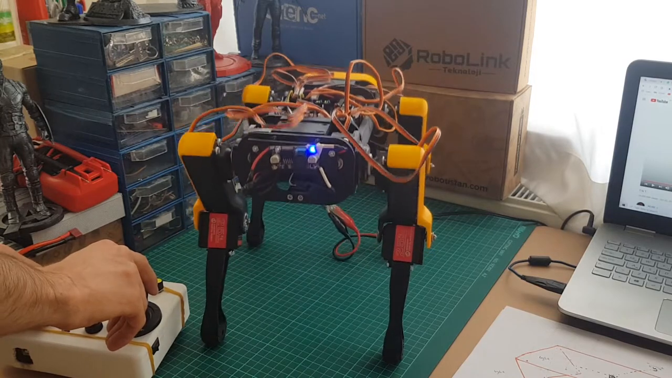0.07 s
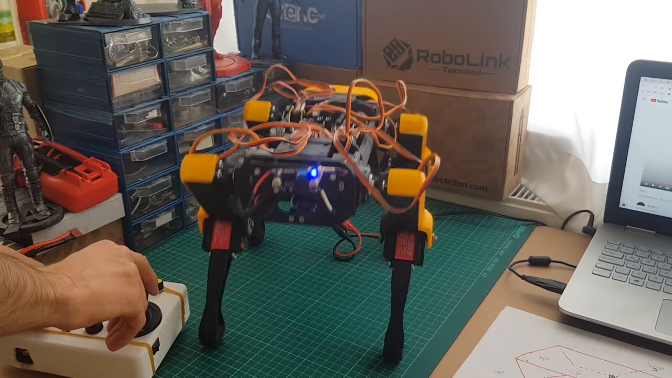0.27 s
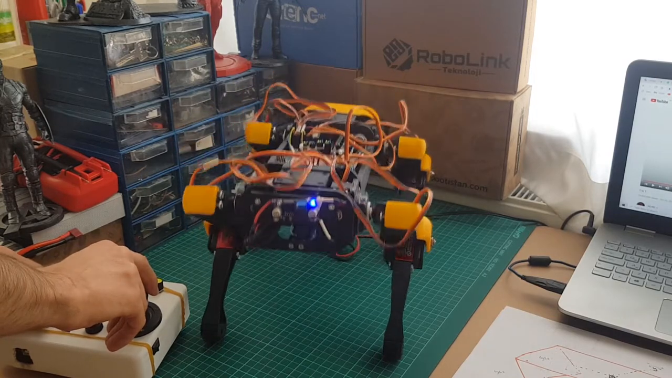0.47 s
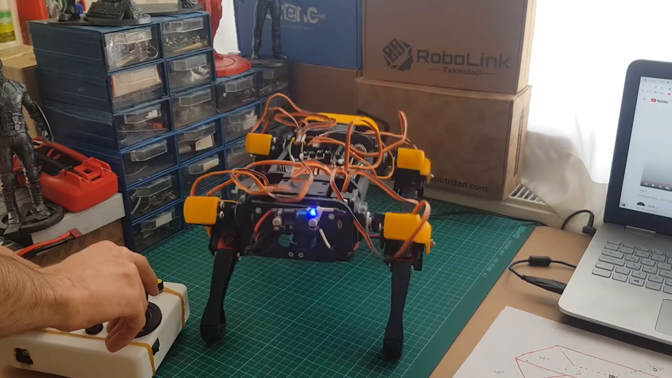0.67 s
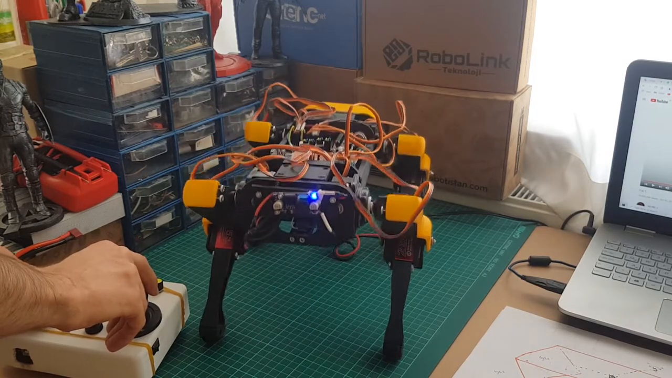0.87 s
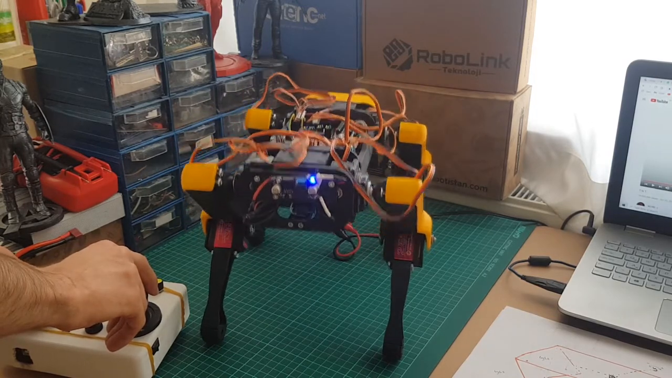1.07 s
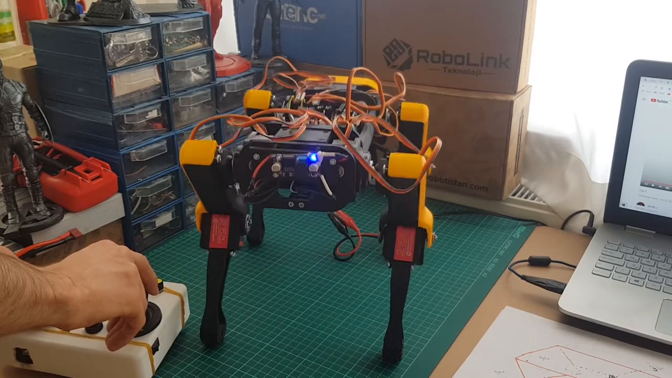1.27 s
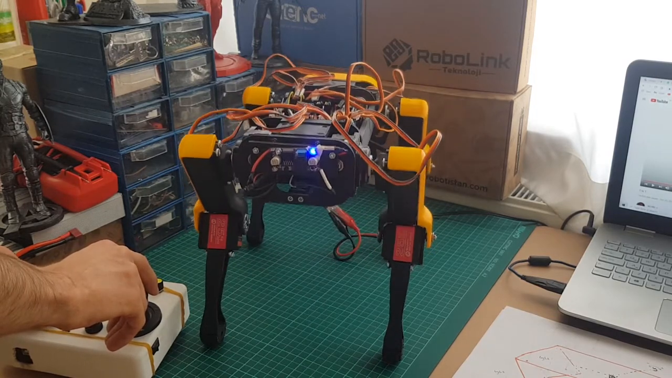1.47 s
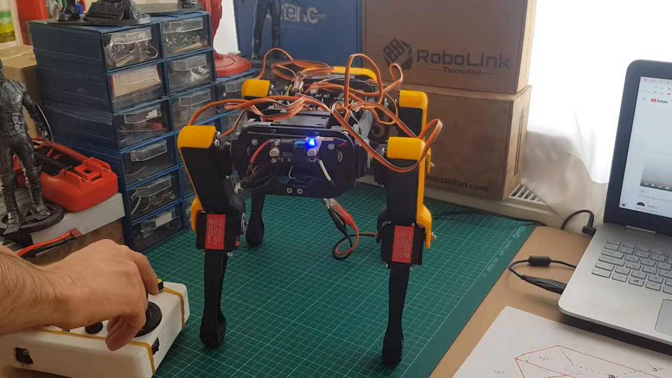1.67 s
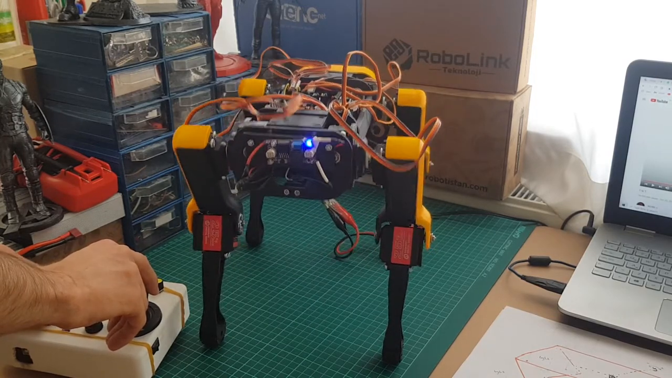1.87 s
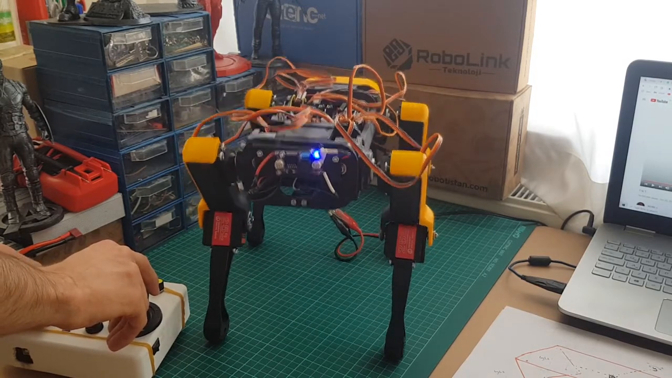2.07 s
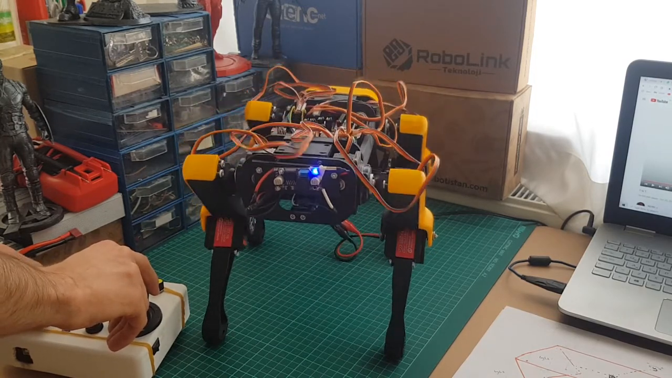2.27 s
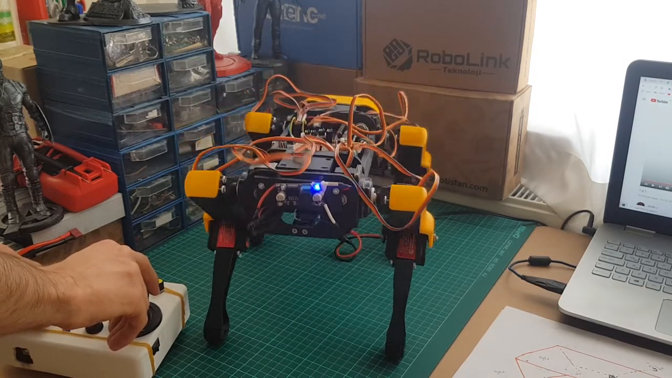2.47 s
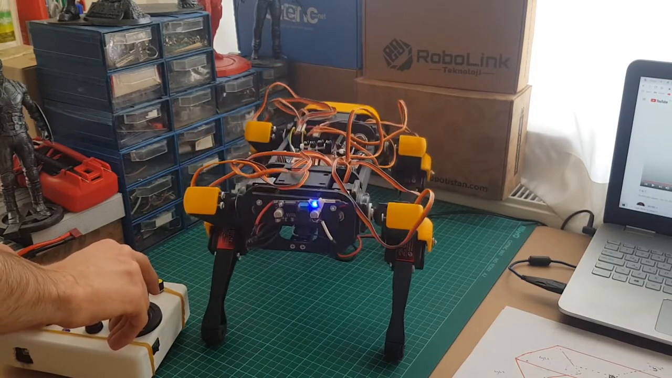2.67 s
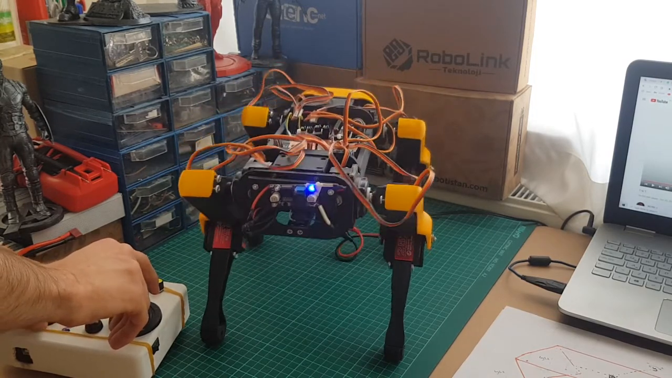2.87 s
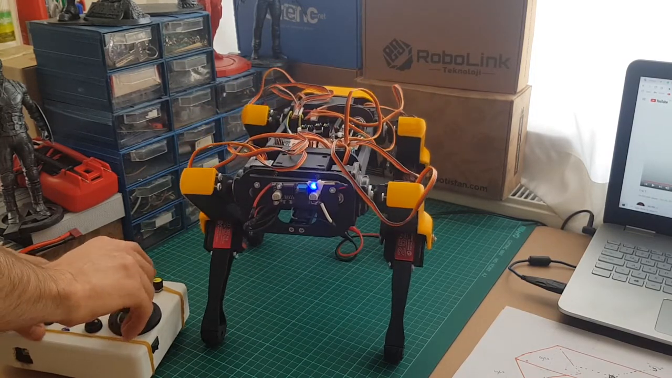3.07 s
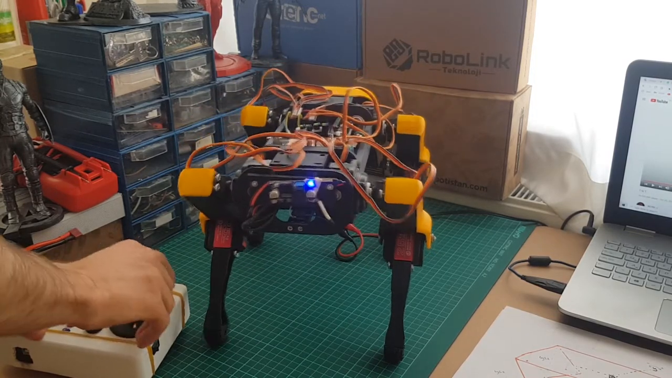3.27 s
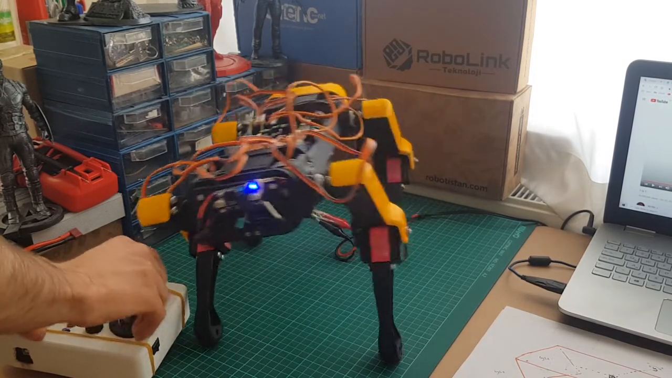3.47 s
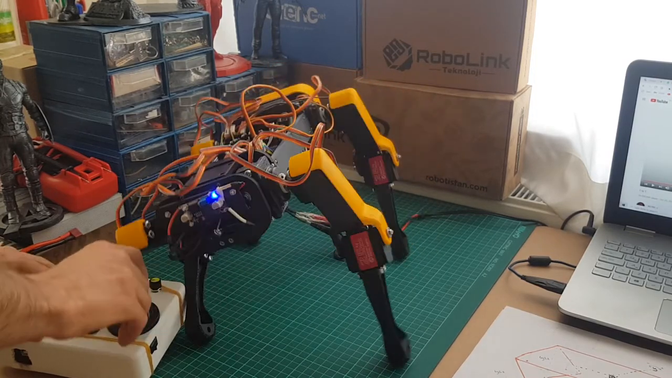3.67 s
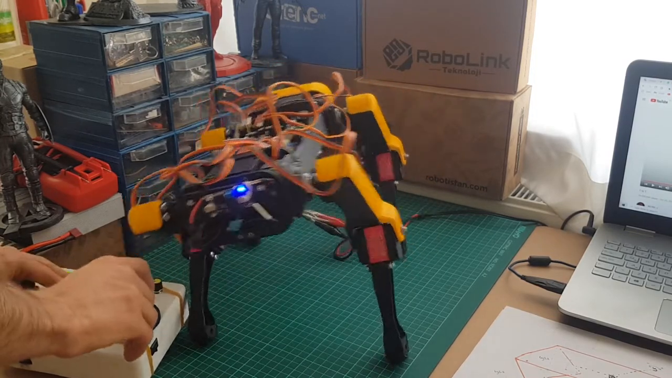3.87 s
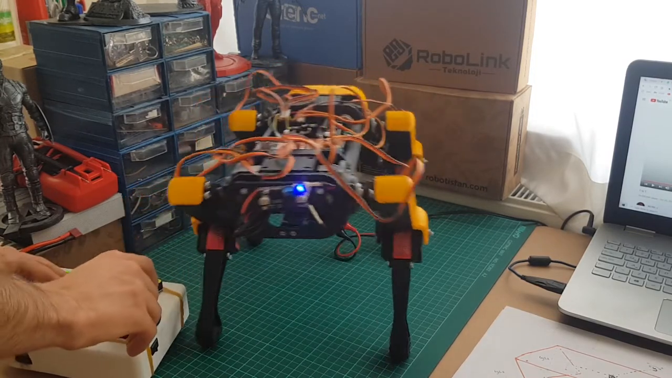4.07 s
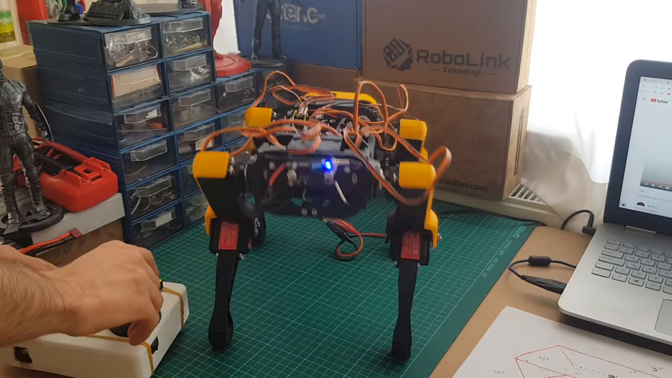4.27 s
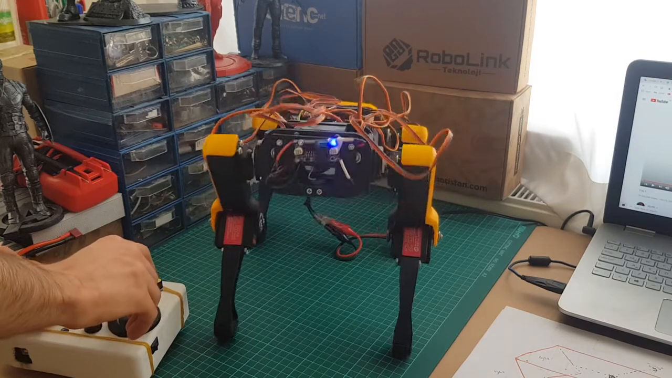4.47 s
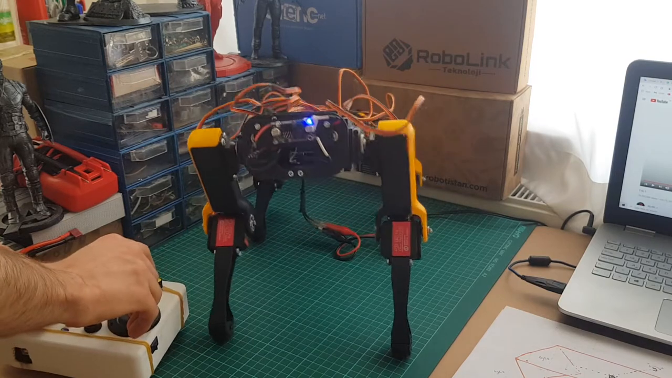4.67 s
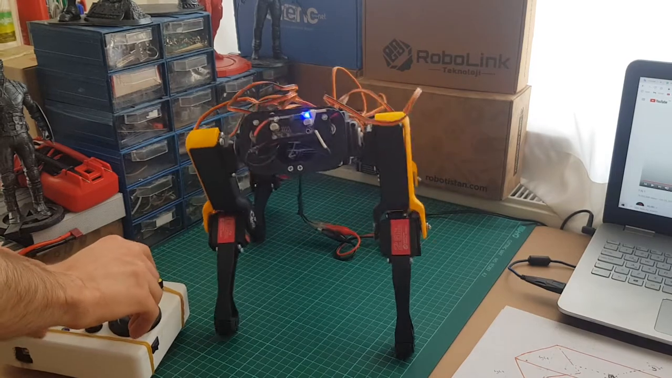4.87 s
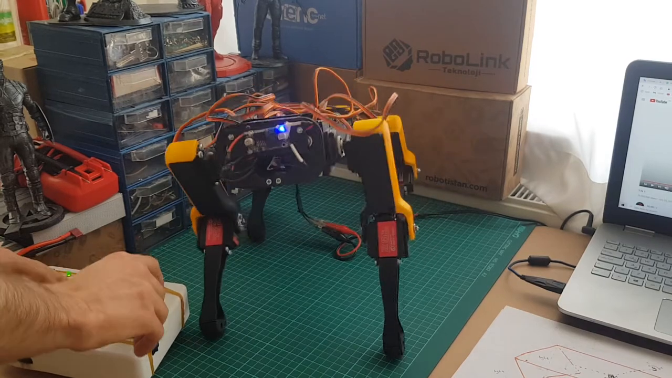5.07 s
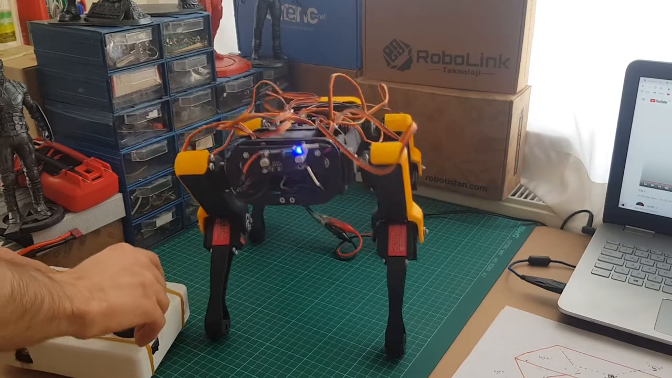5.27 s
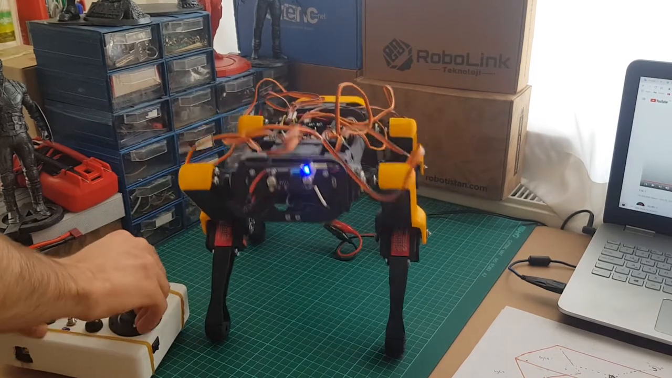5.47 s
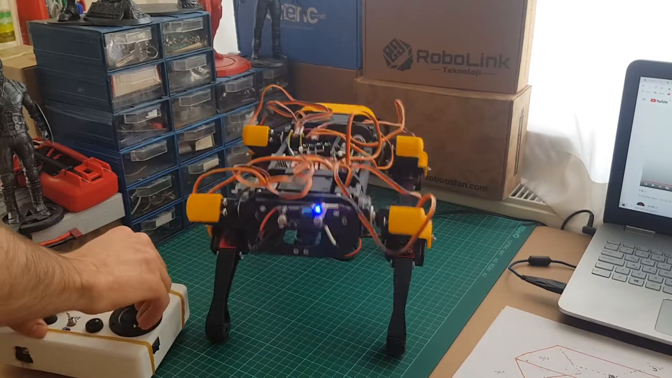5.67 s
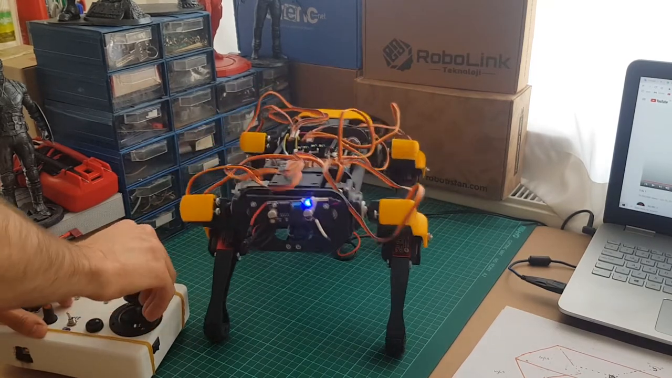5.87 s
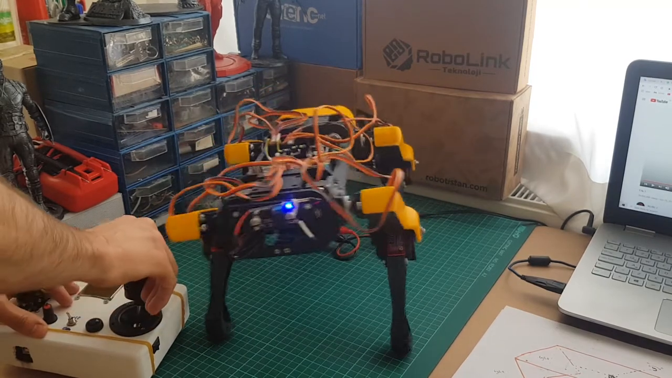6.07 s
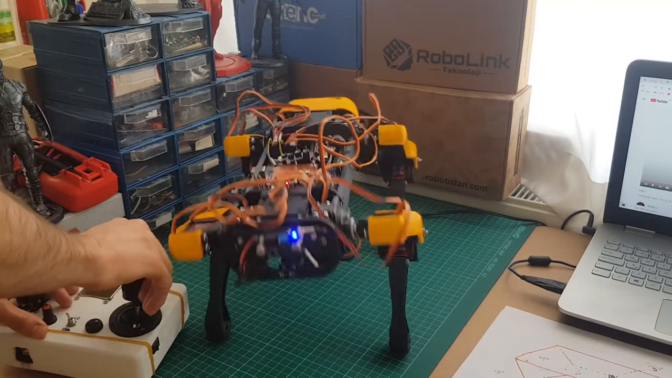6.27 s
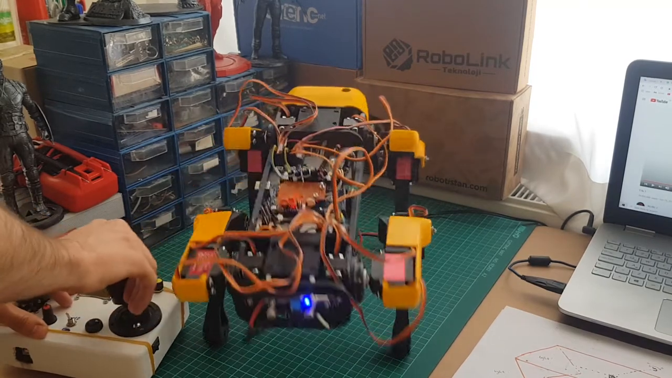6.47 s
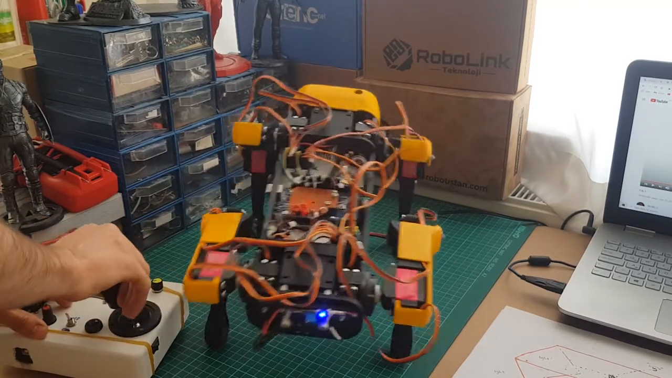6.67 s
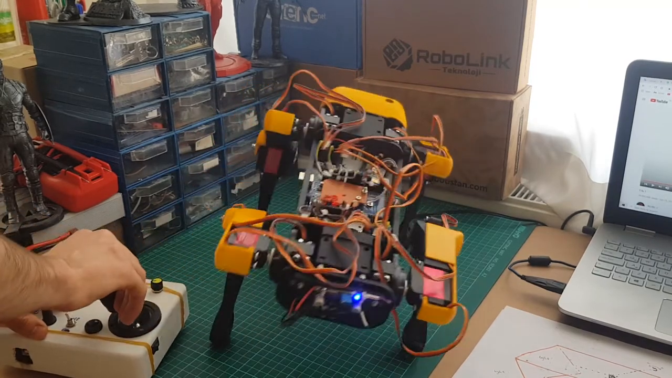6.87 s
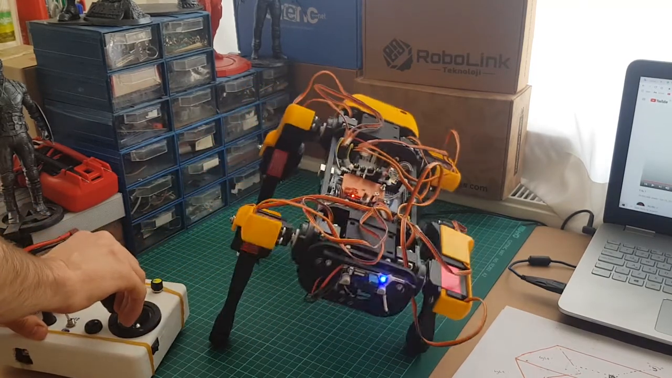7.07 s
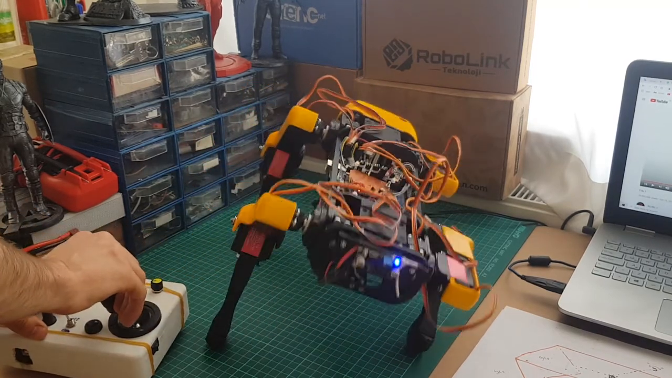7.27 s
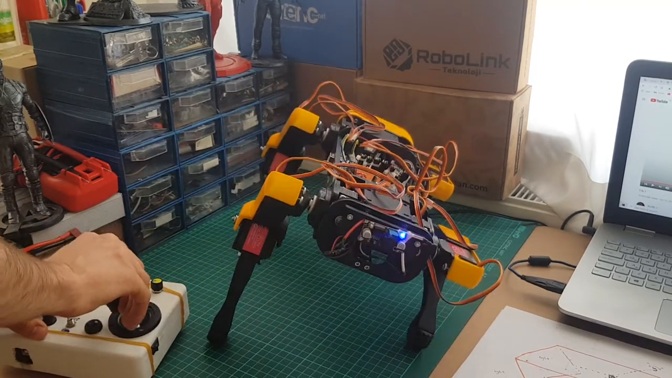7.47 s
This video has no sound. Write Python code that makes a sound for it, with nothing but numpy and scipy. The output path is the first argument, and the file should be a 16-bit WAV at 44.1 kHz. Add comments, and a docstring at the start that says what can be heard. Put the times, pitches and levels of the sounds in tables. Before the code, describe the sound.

From the start, small servo motors in a four-legged robot buzz in short, uneven bursts, high and plastic in tone, with a light grinding of gears. The buzz gets faster and denser with effort, and the workbench rumbles under the feet. A low thud lands at about 0.35 seconds, and loose parts knock between 0.6 and 1 second. From 1.5 seconds a motor occasionally starts with a brief zip, and a gear ticks at 2.4 seconds. The servos pause briefly just after 3 seconds. Lighter thuds come around 2.6, 3.7 and 4.8 seconds, with a few more knocks. Heavier thuds return at about 5, 6.1, 6.6, 7 and 7.3 seconds under busy servo buzzing that runs to the end, near 7.5 seconds. Everything is close to a stereo microphone in a small room with faint background air.

```python
"""A four-legged robot shifts its body on a workbench in a small room, close to a stereo camera.
From the start, over quiet air, gear teeth buzz in the servo cases in short moves, faster and denser
with effort, and the bench rumbles under the feet. The weight lands with a thud at 0.35 s, then loose
parts knock. From 1.5 s a motor now and then kicks off from rest; at 2.4 s a slack tooth ticks.
Lighter thuds follow, and from 5 s to the end heavy ones come back under the busy servos."""
import sys
import numpy as np
from scipy import signal
from scipy.fft import rfft, irfft
from scipy.io import wavfile
from scipy.ndimage import uniform_filter1d

SR = 44100
rng = np.random.default_rng(int(sys.argv[2]) if len(sys.argv) > 2 else 0)


def dump(signal):
    """Clip the signal to [-1, 1] and save it as 16-bit WAV at the path in sys.argv[1]."""
    limited = np.clip(np.atleast_2d(signal).T, -1, 1)
    pcm = np.round(limited * 32767).astype(np.int16)
    wavfile.write(sys.argv[1], SR, pcm)


N = 330750
TIME = np.arange(N) / SR


def gain_of(db):
    """Turns dB into a factor."""
    return 10 ** (np.asarray(db) / 20)


def unit_rms(x):
    """Scales to rms 1."""
    return x / np.sqrt(np.mean(x ** 2) + 1e-20)


def power_sum_db(levels_db):
    """Adds levels as powers."""
    return 10 * np.log10(sum(gain_of(db) ** 2 for db in levels_db))


def curve_at(points, hz):
    """Reads a curve on a log-frequency axis."""
    f, value = np.transpose(points)
    return np.interp(np.log(hz + 1), np.log(f + 1), value)


def equalise(x, points):
    """Causal stereo EQ: the phase is the Hilbert transform of the log gain."""
    log_gain = np.log(gain_of(curve_at(points, abs(np.fft.fftfreq(4096, 1 / SR)))))
    taps = np.fft.ifft(np.exp(np.conj(signal.hilbert(log_gain)))).real[:2048]
    return signal.oaconvolve(x, taps[None], axes=-1)[:, :N]


def drift(seconds):
    """Smooth random modulation of rms 1."""
    size = max(int(seconds * SR), 1)
    return unit_rms(uniform_filter1d(uniform_filter1d(rng.standard_normal(N), size), size))


def resonate(x, hz, width):
    """A two-pole resonance of gain 1."""
    return signal.lfilter(*signal.iirpeak(hz, hz / width, SR), x)


def moving_resonance(x, hz, width):
    """A resonance that follows the curve hz: shift down to zero, smooth twice, shift back."""
    carrier = np.exp(2j * np.pi * np.cumsum(hz) / SR)
    pole = [1, -np.exp(-np.pi * width / SR)]
    return (carrier * signal.lfilter([1], np.convolve(pole, pole), x / carrier)).real


def clicks(rows):
    """One click per (time [s], level [dB]) row."""
    out = np.zeros(N)
    for s, db in rows:
        out[round(s * SR)] += gain_of(db)
    return out


def soften(x, samples):
    """Spreads each click over a contact time."""
    push = signal.windows.hann(samples)
    push = (push / push.sum()).reshape((1,) * (x.ndim - 1) + (-1,))
    return signal.oaconvolve(x, push, axes=-1)[..., :N]


def ring(x, modes):
    """Clicks ring a set of modes; a click of size 1 starts a 0 dB mode near height 1."""
    return sum(gain_of(db) * resonate(x, hz, width) * SR / (2 * np.pi * width)
               for hz, width, db in modes)


# Stereo image of air and bench: (frequency [Hz], left-right coherence [0..1])
COHERENCE = [(60, 1), (240, 0.55), (950, 0.35), (3760, 0.055)]

def stereo_noise():
    """White noise for two microphones, alike in the bass and wide in the treble."""
    common, apart = rfft(rng.standard_normal((2, N)))
    alike = curve_at(COHERENCE, np.fft.rfftfreq(N, 1 / SR))
    return irfft(np.array([common, np.sqrt(alike) * common + np.sqrt(1 - alike) * apart]), N)


# Room tone EQ: (frequency [Hz], gain [dB])
AIR_EQ = [(40, 15.5), (150, -2.5), (500, -13.5), (2000, -14.5), (8000, -24), (14500, -10)]

def room_tone():
    """A bed of quiet air: low rumble and thin hiss."""
    return gain_of(-63) * unit_rms(equalise(stereo_noise(), AIR_EQ))


# Servo cues: (up to speed [s], hold [s], effort as the hold starts [dB], effort as it ends [dB],
# case ring re effort [dB], grind re effort [dB])
SERVO_MOVES = [(0.01, 0.046, -37.0, -42, -35, -21), (0.101, 0.034, -33.5, -32, -16, -21.5),
               (0.185, 0.17, -38.5, -35.5, -10, -23), (0.443, 0.14, -33.5, -34, -16, -20.5),
               (0.691, 0.0038, -38.5, -41.0, -11, -12.5), (0.764, 0.056, -44, -50, -13, -12),
               (0.868, 0.11, -39, -49, -20, -16), (1.019, 0.032, -53.0, -54, -24, -11),
               (1.13, 0.13, -34.0, -32, -9, -22.5), (1.346, 0.065, -38.0, -50, -8.5, -22.5),
               (1.577, 0.005, -38.5, -41.5, -11, -34), (1.647, 0.011, -41.5, -40.5, -5, -27),
               (1.786, 0.051, -46.5, -35.5, -9, -58), (1.941, 0.093, -35.5, -36, -17, -22),
               (2.152, 0.0057, -34.5, -36, -10, -23), (2.258, 0.042, -35.0, -39, -10.5, -22.5),
               (2.369, 0.053, -51.5, -50.5, -25, -35), (2.499, 0.0065, -35, -33.0, -11, -23.5),
               (2.613, 0.022, -33, -33, -15, -21.5), (2.743, 0.074, -46.5, -49.5, -14, -15),
               (2.855, 0.12, -33, -48.5, -16, -24.5), (3.367, 0.074, -43, -38, -9, -47),
               (3.5, 0.12, -35, -33, -5, -25), (3.653, 0.1, -43.5, -35.5, -8, -14.5),
               (3.859, 0.31, -37.5, -36.5, -11.5, -16.5), (4.257, 0.0051, -45.5, -46.5, -22, -15),
               (4.339, 0.049, -35.5, -33.5, -9, -22), (4.588, 0.16, -38.5, -34.5, -3.5, -25.5),
               (4.928, 0.038, -36.5, -32, -1.5, -36.5), (5.07, 0.29, -39.5, -38.5, -11, -16.5),
               (5.51, 0.24, -39.5, -38, -13, -23), (5.904, 0.0058, -38.5, -42, -15, -31),
               (6.056, 0.036, -39.5, -34.5, -28, -14.5), (6.213, 0.06, -51.5, -51.5, -25, -5.5),
               (6.3, 0.32, -35.5, -37, -12, -21.5), (6.699, 0.14, -43.5, -34, -38, -17.5),
               (6.959, 0.077, -38, -35.5, -21, -16.5), (7.115, 0.07, -52, -59, -13, -19),
               (7.261, 0.027, -37, -42.5, -19, -21.5), (7.366, 0.11, -37.5, -47.5, -26, -17)]

def servo_envelopes():
    """Each move spins up ever more gently, holds and runs down; the loudest sets ring and grind."""
    rise_db_per_s, rise_db_per_s2, fall_db_per_s, rest_db = 90, 4900, 270, -80
    moves_db = []
    for s, hold, first_db, last_db, *_ in SERVO_MOVES:
        early, late = np.maximum(s - TIME, 0), np.maximum(TIME - s - hold, 0)
        held_db = np.interp(TIME, [s, s + hold], [first_db, last_db])
        moves_db.append(held_db - rise_db_per_s * early - rise_db_per_s2 * early ** 2
                        - fall_db_per_s * late)
    loudest = np.array(SERVO_MOVES)[np.argmax(moves_db, axis=0)]
    case_db, grind_db = uniform_filter1d(loudest[:, 4:].T, size=900)
    return power_sum_db(moves_db + [rest_db]) + pause_before_kick_db(), case_db, grind_db


# One voice per servo: (tooth rate at -39 dB effort [1/s], joins at effort [dB],
# left over right [dB], left lag [ms])
SERVO_VOICES = [(705.5, -91, -1.5, .1), (816.3, -70.5, 6, -0.37), (610.6, -46, 3.5, 0.29),
                (928, -45, 3, -.15), (548.2, -38, 6, 0.38)]

def gear_teeth(effort_db):
    """Each servo ticks once a tooth; effort adds speed and voices while the level is held even."""
    out = np.zeros((2, N))
    for rate, join_db, pan_db, lag_ms in SERVO_VOICES:
        speed = rate * gain_of(.35 * (effort_db + 39) + 1.3 * drift(.03) + 1.1 * drift(.002))
        hits = np.diff(np.floor(np.cumsum(speed) / SR), prepend=0)
        strength = gain_of(2.25 * rng.standard_normal(N) + 1.95 * drift(.0044))
        hiss = .62 * rng.standard_normal(N)  # brushes and rubbing flanks
        fade_in = np.clip((effort_db - join_db) / 8, 0, 1)
        ticks = fade_in * (hits * strength / np.sqrt(speed / SR) + hiss)
        lag = (lag_ms + .12 * drift(.15)) * SR / 1000  # the legs move, so the paths change
        left = ticks[np.clip(np.arange(N) - lag.astype(int), 0, N - 1)]
        out += [left * gain_of(pan_db / 2), ticks * gain_of(-pan_db / 2)]
    power = uniform_filter1d((out ** 2).mean(0), size=1500)
    return out / np.sqrt(power + 1e-12)


# Tone of a tooth through the plastic: (frequency [Hz], gain [dB])
TOOTH_EQ = [(2600, -4), (4000, 0), (6000, 3.5), (8500, -0.5), (13500, -4), (15000, -15.5)]
# Shell panel resonances: (frequency [Hz], width [Hz], level re the buzz before the low cut [dB])
SHELL_PANELS = [(3130, 2700, -21.5), (5510, 2330, -16)]

def servo_buzz(effort_db, case_db):
    """The teeth ring plastic cases and panels, whose pitch shifts as the limbs turn."""
    teeth = gear_teeth(effort_db)
    buzz = unit_rms(equalise(teeth, TOOTH_EQ))
    case_hz = 7260 + 60.3 * drift(.018)
    buzz += gain_of(case_db) * unit_rms(moving_resonance(teeth, case_hz, width=890))
    for hz, width, db in SHELL_PANELS:
        swell = gain_of(db + 2.5 * drift(.09))
        buzz += swell * unit_rms(moving_resonance(teeth, hz * (1 + .025 * drift(.12)), width))
    low_cut = signal.butter(9, 2450, "high", fs=SR, output="sos")  # small shells radiate little bass
    return signal.sosfilt(low_cut, buzz) * gain_of(effort_db)


def gear_grind(level_db):
    """Uneven slips of loaded gears ring the limbs, each band swelling on its own."""
    limbs_hz, width_hz, slips_per_s = (894, 1210, 1459), 430, 900
    slips = rng.standard_normal((2, N)) * (rng.random(N) < slips_per_s / SR)
    slips *= gain_of(1.6 * drift(.026))
    bands = [resonate(resonate(slips, hz, width_hz), hz, width_hz) for hz in limbs_hz]
    chatter = unit_rms(sum(gain_of(3 * drift(.04)) * band for band in bands))
    power = uniform_filter1d(gain_of(level_db) ** 2, int(.045 * SR))  # carries into short pauses
    return np.sqrt(abs(power)) * chatter


def shake_envelope(lurches, floor_db, rise_db_per_s, fall_db_per_s):
    """Gain of lurches that build and settle over a floor of motor vibration."""
    peaks_db = [db - rise_db_per_s * np.maximum(s - TIME, 0) - fall_db_per_s * np.maximum(TIME - s, 0)
                for s, db in lurches]
    return gain_of(power_sum_db(peaks_db + [floor_db]))


# Bench top resonances, the first three being the rumble: (frequency [Hz], width [Hz], gain [dB])
BENCH_TOP_MODES = [(61, 28.5, -1), (81.2, 17, 0.5), (115.6, 21.7, -1), (221.3, 28, 2), (284.8, 14.6, 5.5),
                   (425, 66, 1), (510, 93, -6.5)]
# Resonances of loose frame parts: (frequency [Hz], width [Hz], gain [dB])
LOOSE_PART_MODES = [(744, 73, -1), (906, 124, -6)]
# Lurches of the body: (time [s], rumble level [dB], drumming level [dB])
BODY_LURCHES = [(0.141, -41, -59), (0.363, -32, -47), (0.757, -36.5, -46.5), (1.271, -47.5, -58),
                (1.6, -47.5, -61.5), (1.973, -43.5, -60), (2.227, -43, -52), (2.361, -39, -59),
                (2.607, -38.5, -45.5), (2.951, -50, -65), (3.379, -50, -58.5), (3.677, -34, -45),
                (3.898, -43, -49.5), (4.117, -45, -53.5), (4.42, -48, -53.5), (4.595, -43.5, -65),
                (4.923, -47, -70), (5.064, -39, -46), (5.315, -43.5, -57.5), (5.693, -43, -56),
                (5.918, -46, -58), (6.106, -39, -45.5), (6.398, -44, -76), (6.64, -35.5, -53),
                (6.987, -37.5, -49.5), (7.33, -40, -53.5), (7.466, -51, -50)]

def bench_shake(effort_db):
    """Lurches and running motors shake the bench through the feet; loose parts rattle on top."""
    shake = stereo_noise() * gain_of(2.8 * drift(.02))
    modes = [gain_of(db) * resonate(resonate(shake, hz, width), hz, 2 * width)
             for hz, width, db in BENCH_TOP_MODES]
    taps = (rng.random((2, N)) < 900 / SR) * gain_of(5 * rng.standard_normal((2, N)))
    taps *= rng.choice([-1., 1.], (2, N))
    rattle = unit_rms(ring(soften(taps, samples=10), LOOSE_PART_MODES))
    rumble = unit_rms(sum(modes[:3]))
    drumming = unit_rms(unit_rms(sum(modes[3:])) + gain_of(-8.5) * rattle)
    motor_power = abs(uniform_filter1d(gain_of(effort_db) ** 2, int(.15 * SR)))
    motor_db = 10 * np.log10(motor_power + 1e-12) + 40  # zero at -40 dB effort
    times, rumble_db, drumming_db = np.transpose(BODY_LURCHES)
    rumble *= shake_envelope(zip(times, rumble_db), -54.5 + .8 * motor_db,
                             rise_db_per_s=276, fall_db_per_s=102)
    drumming *= shake_envelope(zip(times, drumming_db), -61.5 + 1.62 * motor_db,
                               rise_db_per_s=189, fall_db_per_s=61)
    return rumble + drumming


# Weight landing on a foot: (time [s], relative level [dB], tilt above 125 Hz [dB/octave])
FOOT_LANDINGS = [(0.353, -17, -24), (0.77, -41, -16), (2.597, -34.5, 6), (3.648, -35.5, 15),
                 (3.698, -38, -2), (3.846, -29, 3), (4.806, -31.5, 5), (5.05, -18.5, -4.5),
                 (6.092, -18, -1), (6.129, -21, -6), (6.64, -20, -26), (7.003, -18, -18), (7.284, -21, -18)]

def foot_thuds():
    """A rubber foot lands and judders, ringing the bench top in four fading bumps."""
    judder_s, fade_db = .00789, 2.6
    out = np.zeros(N)
    for hz, width, mode_db in BENCH_TOP_MODES[1:]:
        octaves = np.log2(max(hz / 125, 1))
        bumps = [(s + judder_s * k, db - fade_db * k + tilt * octaves)
                 for s, db, tilt in FOOT_LANDINGS for k in range(4)]
        out += ring(soften(clicks(bumps), samples=100), [(hz, width, mode_db - 18)])
    return out


# Hits of loose parts: (time [s], relative level [dB], snap re that level [dB])
LOOSE_PART_HITS = [(0.637, -30.5, -7), (0.706, -23, 7), (0.723, -27, -12), (0.768, -31.5, -14),
                   (0.921, -30.5, 7), (0.998, -33.5, 7), (3.646, -24.5, 8), (3.662, -26, -10),
                   (5.051, -30, 1), (5.2, -29.5, 14), (6.213, -29.5, 6), (6.264, -30.5, -5)]

def loose_knocks():
    """Each loose part knocks with a hollow body and a short, bright snap."""
    body = soften(clicks((s, db) for s, db, _ in LOOSE_PART_HITS), samples=44)
    snap = soften(clicks((s, db + snap_db) for s, db, snap_db in LOOSE_PART_HITS), samples=16)
    return ring(body, LOOSE_PART_MODES) + ring(snap, [(2000, 1700, 0)])


# Bright ring of a single tooth: (frequency [Hz], width [Hz], gain [dB])
TOOTH_MODES = [(7650, 730, 9.0), (10000, 1300, 2.5)]
# Motors starting from rest: (time [s], strike level of the first tooth [dB])
MOTOR_KICKS = [(1.54, -45), (1.758, -53), (3.308, -59), (4.87, -45), (5.473, -50)]

def motor_kicks():
    """A short zip: the first teeth of a starting motor come ever faster as they fade."""
    tooth_s = np.cumsum(1 / np.linspace(360, 750, num=18))
    strikes = [(s + age, db - 90 * age) for s, db in MOTOR_KICKS for age in tooth_s - tooth_s[0]]
    return ring(clicks(strikes), TOOTH_MODES)


def pause_before_kick_db():
    """The effort ducks as the motors rest just before a kick."""
    depth_db, lead_s = -8, .02
    return sum(depth_db * np.exp(-np.maximum(s - TIME, 0) / lead_s) * (TIME < s) for s, _ in MOTOR_KICKS)


# A slack tooth taking up: (time [s], level of the hardest strike [dB])
SLACK_TICKS = [(2.4195, -43)]

def slack_tick():
    """A slack tooth chatters five times, fast enough to read as one tick."""
    strikes = [(s + .0008 * k, db - 4 * abs(k - 2)) for s, db in SLACK_TICKS for k in range(5)]
    return ring(clicks(strikes), TOOTH_MODES)


def room_echoes(x):
    """Sparse echoes from bench, boxes and walls; the pattern changes as the body moves."""
    early_rt60_s, tail_rt60_s, pattern_s = .035, .3, .1
    size, hop = SR // 4, int(pattern_s * SR)
    age = TIME[:size]
    decay = gain_of(-60 * age / early_rt60_s) + gain_of(-24 - 60 * age / tail_rt60_s)
    window = np.sin(np.pi * np.arange(2 * hop) / (2 * hop))  # equal-power crossfade
    slots = np.arange(40, size - 20, 20)
    x = np.pad(x, [(0, 0), (hop, 2 * hop)])
    out = np.zeros((2, N + 3 * hop + size))
    for start in range(0, N + hop, hop):
        delays = slots + rng.integers(0, 20, (2, len(slots)))
        taps = np.zeros((2, size))
        np.put_along_axis(taps, delays, rng.choice([-1., 1.], delays.shape), 1)
        taps *= decay
        grain = x[:, start:start + 2 * hop] * window
        echo = signal.fftconvolve(grain, taps / np.linalg.norm(taps[0]), axes=1)
        out[:, start:start + echo.shape[1]] += echo
    return out[:, hop:hop + N]


def scene():
    """The robot is heard directly and through the room; bench and air stay dry."""
    effort_db, case_db, grind_db = servo_envelopes()
    robot = servo_buzz(effort_db, case_db) + gear_grind(effort_db + grind_db)
    robot += gain_of(-5.5) * loose_knocks() + motor_kicks() + slack_tick()
    return room_tone() + robot + gain_of(-2) * room_echoes(robot) + bench_shake(effort_db) + foot_thuds()


# Colour of the two microphone ports: (frequency [Hz], left over right [dB])
PORT_BALANCE = [(100, -0.5), (350, 2), (800, 1.5), (5000, -2.5), (9000, 2)]

def record(dry):
    """The camera colours left and right differently, then trims the bass and the top."""
    tilt = gain_of(curve_at(PORT_BALANCE, np.fft.rfftfreq(N, 1 / SR)) / 2)
    ports = irfft(rfft(dry) * [tilt, 1 / tilt], N)
    low_cut = signal.butter(3, 44., "high", fs=SR, output="sos")
    high_cut = signal.firwin(511, 14600, window=("kaiser", 9), fs=SR)
    return signal.oaconvolve(signal.sosfilt(low_cut, ports), high_cut[None], "same")


dry = scene()
out = record(dry)
dump(out)
```